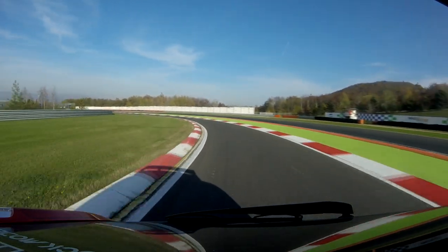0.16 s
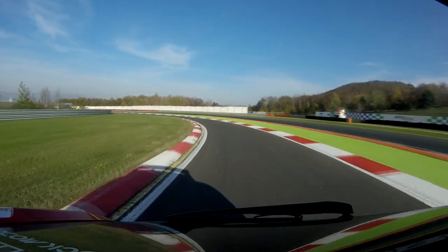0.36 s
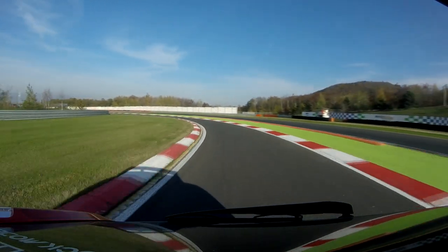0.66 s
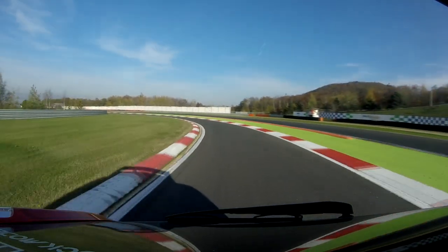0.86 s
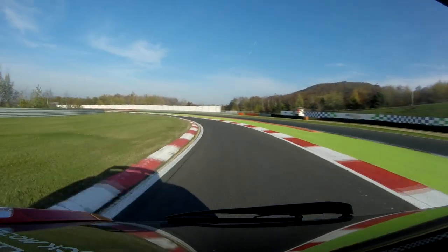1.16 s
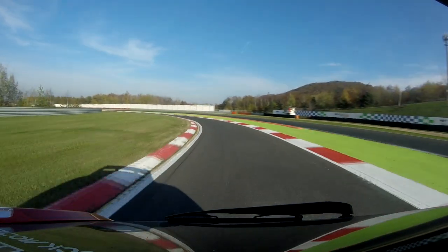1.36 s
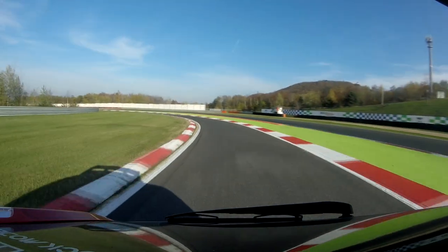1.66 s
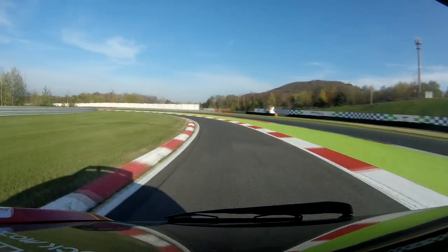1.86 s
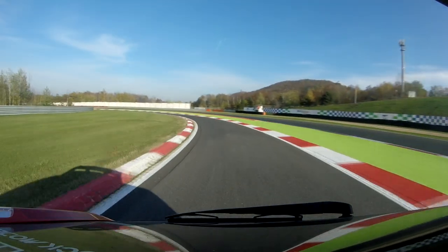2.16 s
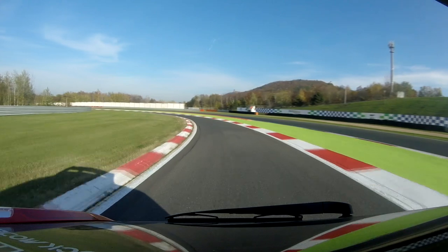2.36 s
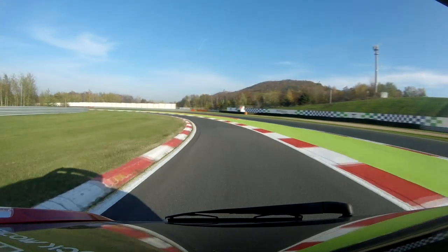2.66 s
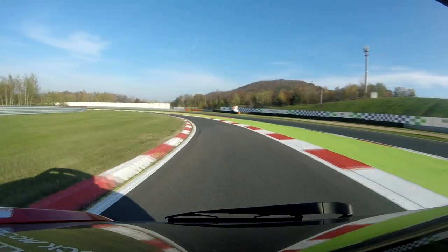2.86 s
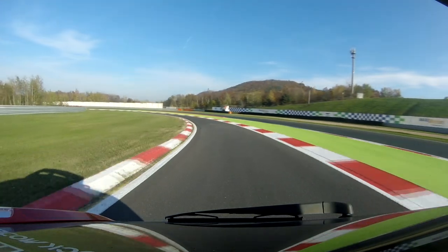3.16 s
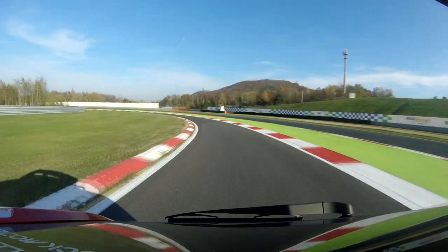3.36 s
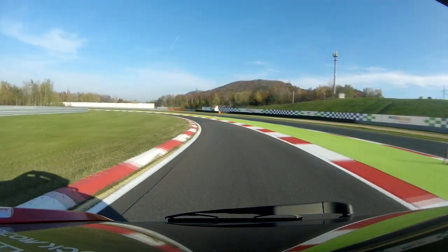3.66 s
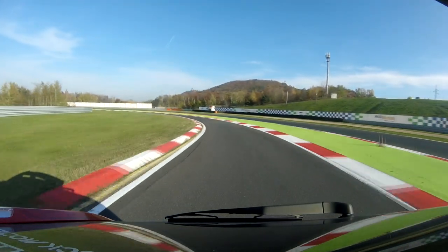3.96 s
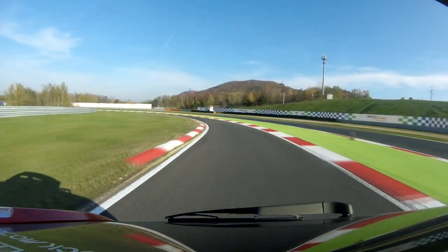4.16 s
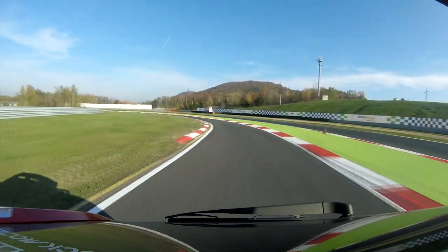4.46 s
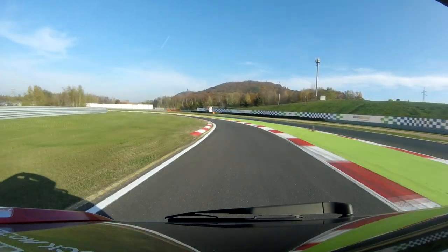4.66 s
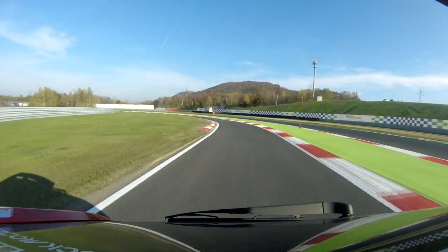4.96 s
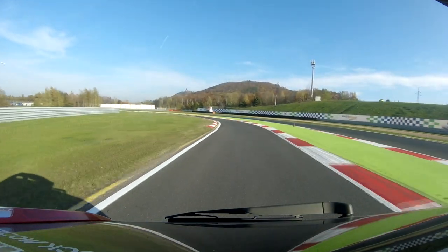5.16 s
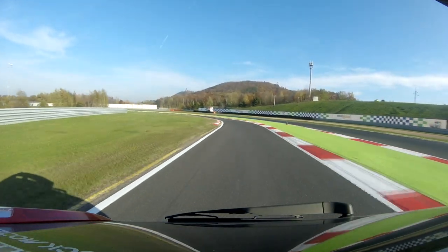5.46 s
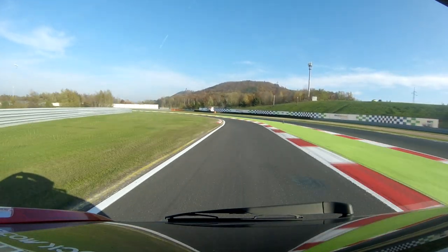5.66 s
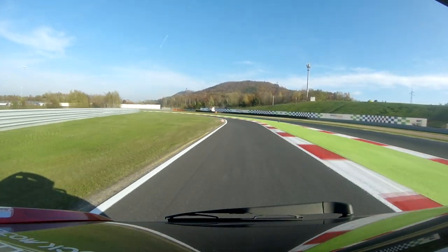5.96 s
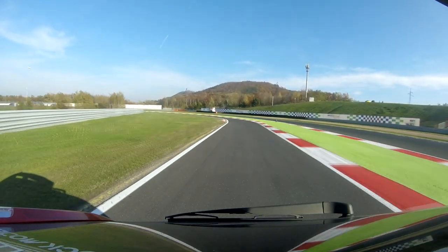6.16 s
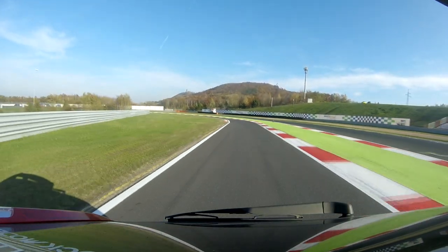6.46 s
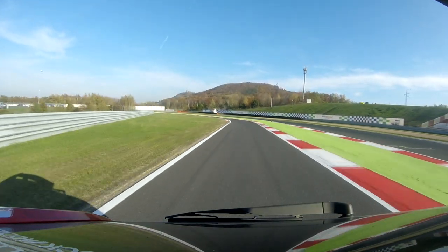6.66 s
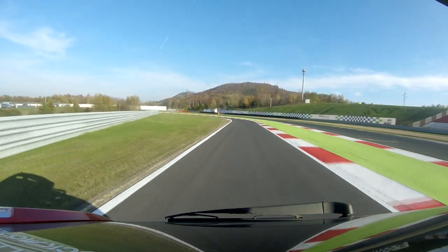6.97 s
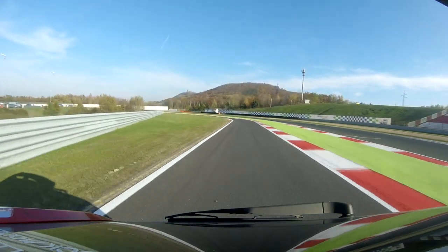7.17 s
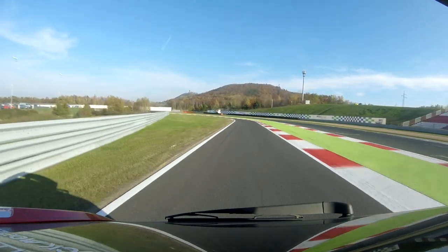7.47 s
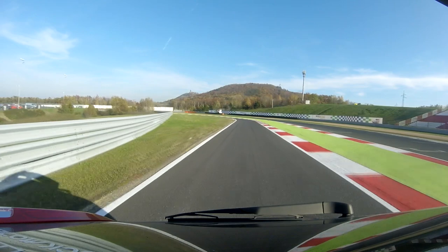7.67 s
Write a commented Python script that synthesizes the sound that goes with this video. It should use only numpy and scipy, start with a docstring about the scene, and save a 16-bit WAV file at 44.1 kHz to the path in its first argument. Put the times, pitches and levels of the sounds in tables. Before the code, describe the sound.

A gruff five-cylinder engine heard from the cabin surges, lifts with popping backfires, pulls again, and cuts out for an instant.

```python
"""In the cabin of a race car, a turbocharged five-cylinder engine pulls, lifts and pulls again.
Orders of the engine cycle make its note and gated noise its roar and hiss; effort sets their levels and the rumble's.
Around the lifts it sputters and the exhaust thumps and bangs; on a trailing throttle the pipe drones evenly.
A loose part clacks twice through its resonances, one soft puff of air hisses and bare impulses tick thinly.
Once, everything but the ticks cuts out for about a tenth of a second."""
import sys
import numpy as np
from scipy.fft import rfft, irfft, next_fast_len
from scipy.io import wavfile
from scipy.ndimage import uniform_filter1d, minimum_filter1d, map_coordinates

SR = 44100
rng = np.random.default_rng(int(sys.argv[2]) if len(sys.argv) > 2 else 0)


def dump(signal):
    """Clip the signal to [-1, 1] and save it as 16-bit WAV at the path in sys.argv[1]."""
    limited = np.clip(np.atleast_2d(signal).T, -1, 1)
    pcm = np.round(limited * 32767).astype(np.int16)
    wavfile.write(sys.argv[1], SR, pcm)


N = 345303  # length in samples


def amp(db):
    """Decibels to gain."""
    return np.exp(np.asarray(db) * (np.log(10) / 20))


def unit(x):
    """Scale to rms 1."""
    return x / np.sqrt(np.mean(x ** 2) + 1e-20)


def curves(rows):
    """One value per sample for each column after the time."""
    s, *cols = np.transpose(rows)
    return [np.interp(np.arange(N) / SR, s, c) for c in cols]


def wobble(rate):
    """A smooth random curve, rate knots a second."""
    steps = np.arange(0, N + 64, 64)
    knots = rng.standard_normal(int(N * rate / SR) + 4)
    coarse = map_coordinates(knots, [steps * rate / SR])
    return np.interp(np.arange(N), steps, coarse)


def bell(s, half_s):
    """A smooth swell from 0 to 1 and back, centred on time s."""
    return np.exp(-((np.arange(N) / SR - s) / half_s) ** 2)


def spell(start, end, fade_s):
    """1 between two times, fading in and out."""
    t = np.arange(N) / SR
    return np.clip(.5 + np.minimum(t - start, end - t) / fade_s, 0, 1)


def filtered(x, response):
    """x times a response of frequency."""
    size = next_fast_len(N + SR // 2)
    return irfft(rfft(x, size) * response(np.fft.rfftfreq(size, 1 / SR)), size)[:N]


def coloured(x, points):
    """x shaped by (Hz, dB) points on a log axis, falling steeply above the last."""
    f, db = np.transpose(points)

    def response(hz):
        curve_db = np.interp(np.log(hz + 1), np.log(f), db)
        return amp(curve_db) / np.maximum(hz / f[-1], 1) ** 4

    return filtered(x, response)


def noise(points, gate=1):
    """Gated noise of rms 1 in the given colour."""
    return unit(coloured(gate * rng.standard_normal(N), points))


def add(track, s, sound):
    """Mix a sound into the track at time s."""
    part = track[round(s * SR):][:len(sound)]
    part += sound[:len(part)]


# Engine speed. Each row: time in seconds, firings per second.
ENGINE_SPEED = [(0.0, 118.75), (0.41, 120.95), (0.96, 115.29), (1.28, 115.94), (1.6, 111.73),
                (1.87, 113.92), (2.25, 112.94), (2.61, 114.66), (4.24, 126.93), (4.38, 123.29),
                (4.68, 123.32), (5.11, 122.21), (5.53, 122.62), (6.01, 124.98), (6.63, 120.76),
                (6.88, 119.7), (7.83, 112.77)]


def crank(jitter):
    """Angle of the engine cycle: five firings to each, with a slight flutter."""
    firing_hz, = curves(ENGINE_SPEED)
    cycle_hz = firing_hz / 5
    return 2 * np.pi * np.cumsum(cycle_hz * (1 + jitter * wobble(30))) / SR


# Engine effort. Each row: time in seconds, effort in dB against full load.
EFFORT_CURVE = [(0, 1), (.48, -1.5), (.93, -11), (1.35, -10), (2, -5.5), (2.5, -3.5), (3.1, -0.5), (4.3, 0),
                (4.5, -6), (4.62, -14.5), (4.95, -12.5), (5.6, -5.5), (6.24, -4.5), (6.46, -10.5),
                (7.2, -8.5), (7.83, -6)]
# Trailing throttle, the engine running evenly. Each row: start in seconds, end in seconds.
TRAILING_THROTTLE = [(0.914, 1.18), (6.812, 8)]
# Sputtering, hardest around the lifts. Each row: start in seconds, end in seconds,
# share of uneven firing (clipped to 0-1), change of the firing note in dB.
SPUTTER_SPELLS = [(-.1, 0.506, 0.2, -2), (.5, 0.905, 1, 2), (1.181, 1.696, .75, -2),
                  (4.166, 5.199, .95, -3.5), (5.202, 6.141, .15, -3), (6.146, 6.824, 1.1, -1)]
OVERRUN_FADE_S, SPUTTER_FADE_S = 0.045, 0.062


def driving():
    """The state of the engine: effort in dB, overrun 0-1, uneven firing 0-1."""
    effort_db, = curves(EFFORT_CURVE)
    overrun = sum(spell(start, end, OVERRUN_FADE_S) for start, end in TRAILING_THROTTLE)
    uneven = sum(share * spell(start, end, SPUTTER_FADE_S) for start, end, share, _ in SPUTTER_SPELLS)
    return effort_db, overrun, np.clip(uneven, 0, 1)


def level(law, state):
    """A layer's level in dB: its effort, overrun and sputter terms summed."""
    full_db, slope, overrun_db, sputter_db = law
    effort_db, overrun, uneven = state
    return full_db + slope * effort_db + overrun_db * overrun + sputter_db * uneven


# The firing note surges for a few beats. Each row: centre in seconds, lift in dB.
NOTE_SURGES = [(.67, 5), (1.24, 4.5), (4.5, 11.5), (4.81, 10.5), (6.3, 4), (6.52, 6)]
# It sags where a few firings fail. Each row: centre in seconds, change in dB.
FAILED_FIRINGS = [(.55, -9.5), (.89, -5.5), (4.74, -12), (4.86, -9), (6.46, -15), (6.57, -7.5)]
SURGE_S, MISFIRE_S = 0.029, 0.027  # half lengths


def stumbles():
    """dB by which sputtering, surges and misfires move the firing note."""
    sputter_db = sum(db * spell(start, end, SPUTTER_FADE_S) for start, end, _, db in SPUTTER_SPELLS)
    surge_db = sum(db * bell(s, SURGE_S) for s, db in NOTE_SURGES)
    misfire_db = sum(db * bell(s, MISFIRE_S) for s, db in FAILED_FIRINGS)
    return sputter_db + surge_db + misfire_db


# Orders of the two-turn engine cycle around the firing note, which is order 5.
# Each row: order, relative level at full throttle in dB, relative level at light throttle in dB.
ENGINE_ORDERS = [(1, -49, -60), (2, -78, -49), (3, -30.5, -35), (4, -29.5, -33), (6, -42, -47),
                 (7, -47.5, -54), (8, -43, -41.5), (9, -35.5, -39.5), (10, -25, -25.5), (11, -43, -53.5),
                 (12, -31.5, -37), (13, -35.5, -33), (14, -43.5, -42.5), (15, -34.5, -43.5), (16, -43, -60),
                 (17, -45.5, -52.5), (18, -50.5, -52), (19, -46, -62.5), (20, -48, -40), (21, -47, -44),
                 (22, -51.5, -46.5), (23, -47, -40.5), (24, -60.5, -49), (25, -49, -45), (26, -43, -49.5),
                 (27, -57.5, -57), (28, -48.5, -45.5), (29, -53.5, -50.5), (30, -45.5, -51),
                 (31, -48.5, -52), (32, -42.5, -50), (33, -43.5, -47.5), (34, -49.5, -55), (35, -46, -51.5),
                 (36, -49, -61.5), (37, -49.5, -67.5), (38, -45.5, -65.5)]
# Resonances of the cabin. Each row: frequency in Hz, gain in dB.
CABIN_RESONANCES = [(70, 4), (100, -7.5), (195, 1.5), (215, 2.5), (240, 3), (290, -1), (338, 6.5),
                    (366, -8.5), (400, -0.5), (480, 1.5), (560, -4), (650, 1), (720, -0.5), (780, 0.5)]
# How the firing note, the low orders and the high orders follow the engine. Each holds: base level
# at full load in dB, dB per dB of effort, dB added on overrun, dB added by sputtering.
FIRING_NOTE_LAW = (-13.5, 0.84, 7.5, 0.5)
LOW_ORDER_LAW = (-21.5, 1.14, 3.4, -4)
HIGH_ORDER_LAW = (-35.5, 1.04, 6.5, -0.5)
THROTTLE_RANGE_DB = 9  # effort lost between open and shut throttle
STUTTER_DB, STUTTER_PER_S = 3.5, 32


def exhaust(angle, state, rough):
    """The firing note and the orders that unequal cylinders put around it."""
    effort_db, overrun, uneven = state
    throttle = np.clip(1.5 + effort_db / THROTTLE_RANGE_DB, 0, 1) * (1 - overrun)

    stutter_db = STUTTER_DB * uneven * wobble(STUTTER_PER_S)
    boom_db = level(FIRING_NOTE_LAW, state) + stumbles() + stutter_db
    firing = 5 * angle
    boom = amp(boom_db) * np.sqrt(2) * np.cos(firing + 0.14 * uneven * wobble(35))

    bark, rasp = np.zeros((2, N))
    shake = rough + .8 * uneven ** 2  # uneven burns smear every order
    for order, full_db, light_db in ENGINE_ORDERS:
        locked = order == 10  # the octave keeps in step with the firing pulse
        offset = 0 if locked else rng.uniform(0, 2 * np.pi)
        size = amp(light_db + throttle * (full_db - light_db)) * (1 + shake * wobble(22))
        line = size * np.cos(order * angle + offset + shake * wobble(22))
        if order <= 16:
            bark += line
        else:
            rasp += line
    # the orders slide through the fixed resonances of the cabin
    bark, rasp = unit(coloured(bark, CABIN_RESONANCES)), unit(coloured(rasp, CABIN_RESONANCES))
    return boom + amp(level(LOW_ORDER_LAW, state)) * bark + amp(level(HIGH_ORDER_LAW, state)) * rasp


# Noise colours of the gas, from low chuffs up to turbo hiss. Each row: frequency in Hz, relative level in dB.
CHUFF_COLOUR = [(90, -48), (170, 5.5), (300, 12.5), (400, 7.5), (600, -48.5)]
RASP_COLOUR = [(280, -26.5), (400, -8), (480, 4.5), (570, -1.5), (800, 1), (900, -10), (1100, -16),
               (1600, -70)]
ROAR_COLOUR = [(600, -33.5), (950, 3), (1250, 0), (1500, -5.5), (1800, -8.5), (2250, -15), (2900, -19),
               (3700, -27), (5000, -48.5)]
HISS_COLOUR = [(2000, -20), (3500, -3), (4200, 2), (4900, 4.5), (5700, 1), (6200, 6), (6500, 10.5),
               (6900, 1.5), (8500, -3.5), (10000, -10.5), (13500, -22), (16000, -32)]
# How roar and hiss follow the engine. Each holds: base level at full load in dB,
# dB per dB of effort, dB added on overrun, dB added by sputtering.
ROAR_LEVEL_LAW = (-42.5, 1, 0, -.3)
HISS_LEVEL_LAW = (-62, 1, 1.3, 0.1)


def gas_flow(angle, state, depth, chuff_gain_db, rasp_gain_db):
    """Turbulence puffs at each firing, one cylinder the strongest; the turbo hisses above it."""
    firing = 5 * angle
    puffs = np.exp(depth * np.cos(firing) + 0.081 * np.cos(angle))
    chuff = amp(level(LOW_ORDER_LAW, state) + chuff_gain_db) * noise(CHUFF_COLOUR, puffs)
    rasp = amp(level(HIGH_ORDER_LAW, state) + rasp_gain_db) * noise(RASP_COLOUR, puffs)

    # valve and piston clatter repeats with each engine cycle
    pattern = rng.standard_normal(512)
    place = angle / (2 * np.pi) * len(pattern) % len(pattern)
    clatter = map_coordinates(pattern, [place], mode="grid-wrap")
    roar = unit(noise(ROAR_COLOUR, puffs) + 0.35 * unit(coloured(clatter * puffs, ROAR_COLOUR)))
    roar *= amp(level(ROAR_LEVEL_LAW, state) + 0.28 * wobble(10))

    hiss = noise(HISS_COLOUR, puffs ** 0.29)  # only faintly pulsed
    hiss *= amp(level(HISS_LEVEL_LAW, state) + 0.67 * wobble(20))
    return chuff + rasp + roar + hiss


# Exhaust afterfires. Each row: start in seconds, relative thump in dB, relative crack in dB.
AFTERFIRES = [(0.595, -7, -26), (0.619, -2.5, -49), (.646, -6, -32), (0.678, -17, -32.5),
              (0.704, -2.5, -34), (0.762, -1.5, -13), (0.788, -3, -18.5), (.823, -4.5, -23.5),
              (0.86, -5, -31), (1.217, -10, -51), (1.256, -9, -39), (1.59, -6.5, -36), (4.335, 1.5, -20.5),
              (4.4, -6.5, -39), (4.446, -9, -25.5), (4.463, -5, -29), (4.485, -9.5, -22.5),
              (4.5772, -6.5, -4.5), (4.611, -14.5, -35), (4.674, -7.5, -19.5), (4.809, -27, -43),
              (4.889, -12.5, -34), (4.959, -12, -39.5), (5.041, -14.5, -31.5), (6.149, -9.5, -39),
              (6.181, -5, -37.5), (6.23, -4, -25.5), (6.289, -3.5, -21.5), (6.3666, -2.5, -13),
              (6.400, -2, -25), (6.434, -7, -30), (6.628, -13, -34), (6.696, -13, -34.5),
              (6.783, -5.5, -17)]
# Body panels struck by a bang. Each row: frequency in Hz, relative level in dB, 60 dB decay in seconds.
STRUCK_PANELS = [(198, -6.5, 0.11), (330, -10, 0.022), (497, -5.5, .035), (726, 5, 0.03),
                 (1060, -4.5, 0.02), (1330, -13.5, 0.023), (1740, -12, 0.02), (2550, -21, 0.024),
                 (3140, -20, 0.013), (6480, -42, .035)]
# Noise colours of the crack and the body's shudder. Each row: frequency in Hz, relative level in dB.
CRACK_COLOUR = [(120, -18.5), (300, -2.5), (480, 12.5), (720, 12.5), (1100, -1.5), (1500, -13),
                (2100, -22.5), (3100, -24), (4000, -37), (6600, -37), (8000, -60.5)]
SHUDDER_COLOUR = [(100, -18), (200, 7.5), (300, 7.5), (400, -8.5), (490, 7.5), (620, -3), (800, -2.5),
                  (1000, -17), (1500, -28), (2500, -44.5)]


def afterfires(pipe_hz, swell_s, crack_t60, tail_t60, tail_db, thump_gain_db, crack_gain_db,
               ring_gain_db, shudder_gain_db, shudder_swell_s):
    """Fuel lights in the pipe: a low pressure swing, a noisy crack, and body panels that ring and shudder."""
    t = np.arange(SR // 5) / SR

    def bump(rise_s):
        """A pulse that peaks at 1 after rise_s."""
        return t / rise_s * np.exp(1 - t / rise_s)

    push = bump(swell_s) * np.cos(2 * np.pi * pipe_hz * t)
    decay = amp(-60 * t / crack_t60) + amp(tail_db - 60 * t / tail_t60)
    burst = (1 - np.exp(-t / 0.00017)) * decay
    hz, mode_db, t60 = np.transpose(STRUCK_PANELS)[:, :, None]
    modes = amp(mode_db - 60 * t / t60) * np.sin(2 * np.pi * hz * t) * (1 - np.exp(-t / 0.00086))

    thumps, bursts, rings, shudders = np.zeros((4, N))
    for s, thump_db, crack_db in AFTERFIRES:
        add(thumps, s, amp(thump_db + thump_gain_db) * push)
        add(bursts, s, amp(crack_db + crack_gain_db) * burst)
        # even soft pops shake the body
        add(shudders, s, amp(0.47 * crack_db + shudder_gain_db) * bump(shudder_swell_s))
        # only hard bangs have a front steep enough to reach the high modes
        strike_db = crack_db * (1.64 + hz / 6000) + rng.normal(0, 1.3, hz.shape)
        add(rings, s, np.sum(amp(strike_db + ring_gain_db) * modes, axis=0))
    # the cabin wall muffles the pressure swing
    muffled = filtered(thumps, lambda f: 1 / (1 + 1j * f / 900) ** 2)
    return muffled + bursts * noise(CRACK_COLOUR) + rings + shudders * noise(SHUDDER_COLOUR)


# Strikes of the loose part. Each row: start in seconds, relative level in dB.
LOOSE_STRIKES = [(.894, -39), (1.499, -28)]
# Its resonances. Each row: centre in Hz, width in Hz, gain in dB.
LOOSE_PART_MODES = [(280, 110, 15), (800, 400, -5.5), (1400, 500, -2), (1840, 450, 8.5), (2350, 430, 4.5),
                    (2820, 450, 5), (3350, 400, -0.5), (3820, 350, -4.5), (6392, 450, -21)]


def clacks(t60, gain_db):
    """A loose part strikes and chatters briefly in its own resonances."""
    t = np.arange(SR // 5) / SR
    chatter = np.zeros(N)
    for s, db in LOOSE_STRIKES:
        add(chatter, s, amp(db + gain_db - 60 * t / t60))

    def part(f):
        response = 0
        for k, (centre, width, db) in enumerate(LOOSE_PART_MODES):
            band = 1j * f * width / (centre * centre - f * f + 1j * f * width)
            response = response + (-1) ** k * amp(db) * band  # neighbours in opposite sign
        return response

    return filtered(chatter * rng.standard_normal(N), part)


# Thin ticks. Each row: time in seconds, relative level in dB.
THIN_TICKS = [(0.5308, -35.5), (0.593, -40.5), (0.7221, -36.5), (2.0801, -35.5), (2.174, -27), (4.364, -41),
              (4.525, -32), (4.685, -50.5), (6.316, -35)]
# Their colour. Each row: frequency in Hz, gain in dB.
TICK_COLOUR = [(300, 16.5), (1200, 18.5), (3000, 11), (7000, 3), (10500, -4), (12000, -14), (15000, -26)]


def ticks(gain_db):
    """Thin, dry ticks: single impulses through one colour."""
    spikes = np.zeros(N)
    for s, db in THIN_TICKS:
        add(spikes, s, amp([db + gain_db]))
    return coloured(spikes, TICK_COLOUR)


# The soft hiss. Each row: centre in seconds, half length in seconds, level in dB.
SOFT_HISSES = [(1.723, 0.054, -64.5)]
# Its colour. Each row: frequency in Hz, relative level in dB.
SOFT_HISS_COLOUR = [(3000, -10), (4300, 8), (5300, -3.5), (6500, -2), (8000, -13.5)]


def air_puffs():
    """A soft, short hiss: noise that swells and fades."""
    return sum(amp(db) * bell(s, half_s) for s, half_s, db in SOFT_HISSES) * noise(SOFT_HISS_COLOUR)


# Colour of the body rumble. Each row: frequency in Hz, relative level in dB.
RUMBLE_COLOUR = [(8, -18), (20, -4), (30, 0), (48, -7), (72, -2.5), (110, -9), (200, -14), (320, -18.5),
                 (420, -36), (900, -73.5)]
# How it follows the engine. It holds: base level at full load in dB, dB per dB of effort,
# dB added on overrun, dB added by sputtering.
RUMBLE_LEVEL_LAW = (-27, 0.17, -2, 4)
# Stretches where it swells. Each row: centre in seconds, half length in seconds, lift in dB.
ROAD_SWELLS = [(.35, .35, 5.5), (3.943, 0.35, 5.5)]


def road(state, lumps_db):
    """Tyres and engine shake the body shell, more under load and when the engine sputters."""
    swell_db = sum(db * bell(s, half_s) for s, half_s, db in ROAD_SWELLS)
    rumble_db = level(RUMBLE_LEVEL_LAW, state) + swell_db + lumps_db * wobble(4.8)
    return amp(rumble_db) * noise(RUMBLE_COLOUR)


def scene():
    """Every layer but the ticks, as it meets in the cabin."""
    angle = crank(jitter=.0015)
    state = driving()
    engine = exhaust(angle, state, rough=.06)
    flow = gas_flow(angle, state, depth=.4, chuff_gain_db=-19, rasp_gain_db=-5.5)
    pops = afterfires(pipe_hz=81.0, swell_s=0.0034, crack_t60=0.048, tail_t60=0.15, tail_db=-15.5,
                      thump_gain_db=1, crack_gain_db=-9.5, ring_gain_db=-2.0,
                      shudder_gain_db=-15.5, shudder_swell_s=0.0053)
    loose = clacks(t60=0.06, gain_db=6)
    return (engine + flow + pops + loose + air_puffs() + road(state, lumps_db=1.5))[None]


# The cut-out. It holds: start in seconds, end in seconds.
CUT_OUT = (2.079, 2.1722)
TOP_HZ = 15800  # nothing passes above


def record(dry):
    """A fast limiter holds the bangs down, the sound cuts out briefly, ticks join and the top is band limited."""
    ceiling = .8
    needed = ceiling / np.maximum(abs(dry[0]), ceiling)
    held = minimum_filter1d(needed, size=40)
    gain = uniform_filter1d(uniform_filter1d(held, size=20), size=20)
    t = np.arange(N) / SR
    live = uniform_filter1d(1.0 * ((t < CUT_OUT[0]) | (t > CUT_OUT[1])), size=24)
    fade = np.clip(np.minimum(t, t[-1] - t) / .004, 0, 1)
    mix = dry[0] * gain * live * fade + ticks(gain_db=13)
    return filtered(mix, lambda hz: hz < TOP_HZ)[None]


dry = scene()
out = record(dry)
dump(out)
```